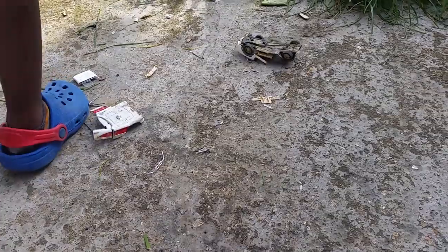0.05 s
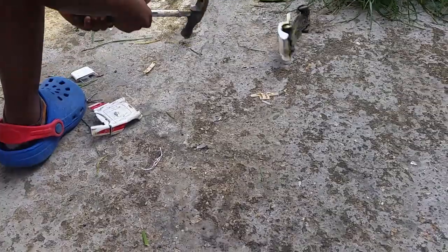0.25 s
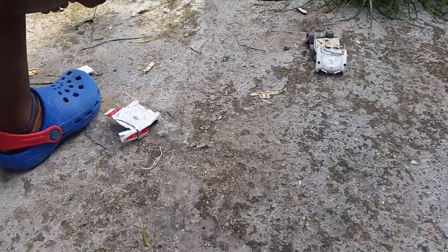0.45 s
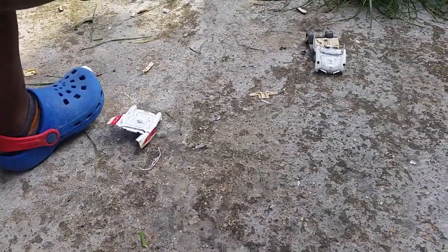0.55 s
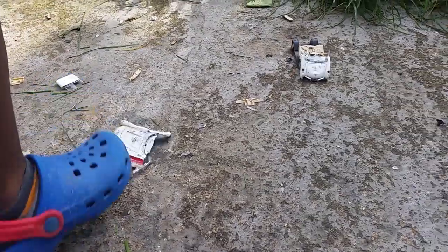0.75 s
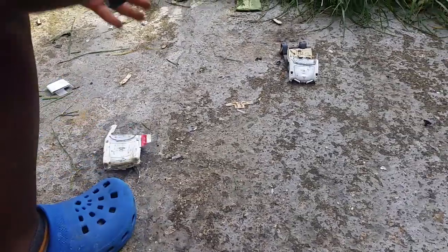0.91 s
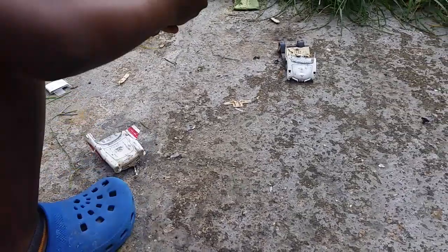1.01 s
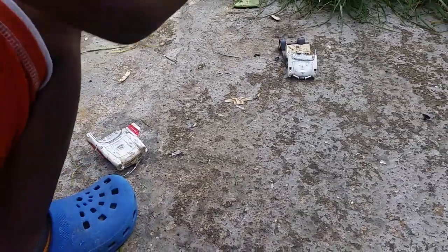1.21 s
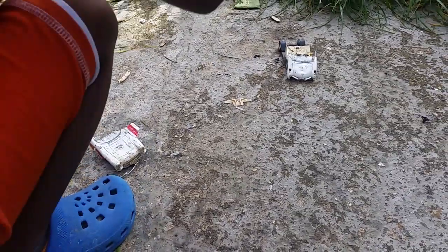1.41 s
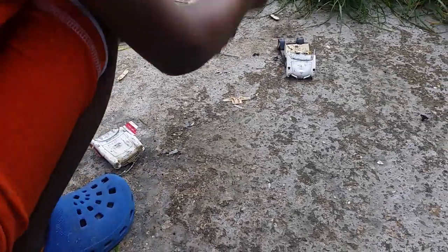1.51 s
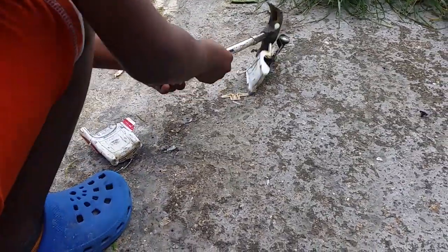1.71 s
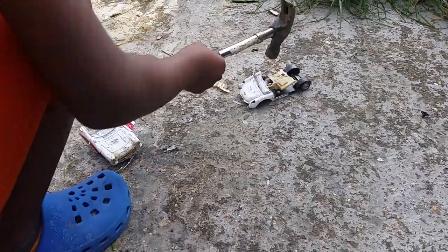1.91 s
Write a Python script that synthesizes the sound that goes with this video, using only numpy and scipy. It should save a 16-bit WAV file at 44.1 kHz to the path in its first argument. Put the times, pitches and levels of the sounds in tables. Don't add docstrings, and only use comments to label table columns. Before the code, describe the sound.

Hammer striking a toy car on concrete, close in stereo outdoors. Tinny rattles and a gritty scrape until 0.18 s, then a very loud, sharp crack at 0.23 s with hollow knocks and a bounce near 0.32 s. Faint thumps; a shoe nudges a loose shell, rattling at 0.55-0.67 and 0.8-1.1 s. Wind rumble swells with a faint high whistle before a weaker blow at 1.67 s and clattering bounces to 1.93 s.

```python
import sys
import numpy as np
from scipy import signal
from scipy.io import wavfile
from scipy.ndimage import uniform_filter1d

SR = 44100
rng = np.random.default_rng(int(sys.argv[2]) if len(sys.argv) > 2 else 0)


def int16_out(signal):
    q = np.round(np.clip(np.atleast_2d(signal).T, -1, 1) * 32767)
    wavfile.write(sys.argv[1], SR, q.astype(np.int16))


def field_ratio(decibels):
    return 10 ** (np.asarray(decibels, dtype=float) / 20)


N = 85995

# (time [s], level [dB], t60 [s], share of bright splinter [0-1])
CRACKS = [(0.2328, 4.5, 0.066, 0.54), (0.243, -12, 0.04, 0.03), (0.2654, -21, 0.26, 0.22),
          (.311, -29, .04, 0), (0.316, -20, 0.025, 0.23), (.343, -42.5, 0.032, 0.07),
          (0.4062, -32, 0.088, 0.08), (.443, -48.5, 0.052, 0.4), (0.4946, -51, 0.26, 0.27),
          (0.5096, -34, 0.096, 0.07), (0.5265, -32, 0.022, 0.53), (0.967, -44.5, 0.061, 0.12),
          (1.6705, -22.5, 0.03, 0.31), (1.6749, -23.5, 0.082, 0.6), (1.695, -31, 0.15, 0.5),
          (1.711, -27.5, 0.11, 0.36), (1.7215, -40, 0.13, 1), (1.737, -39.5, .08, 0.35),
          (1.749, -42, 0.134, 0.39), (1.781, -41, 0.15, 0.27), (1.8135, -44, 0.18, 0.4),
          (1.8286, -45.5, 0.065, 0.2), (1.84, -44.5, .08, 0.2), (1.845, -27.5, 0.02, 0.61),
          (1.853, -37.5, 0.095, 0), (1.897, -50, 0.16, 0.05), (1.929, -54, 0.036, 0.05)]
# (frequency [Hz], level [dB])
CAR_COLOUR = [(410, -33.5), (700, -4.5), (2700, -2.5), (6890, -1.5), (15000, -15.5), (16500, -21.5)]
# (frequency [Hz], level [dB])
SPLINTER_COLOUR = [(8000, -14), (12000, -9.5), (15000, -0.5), (16200, -5.5)]
# (time [s], level [dB])
SCRAPE = [
    (0, -42),
    (.07, -44),
    (.085, -34),
    (.13, -33),
    (.172, -32.5),
    (.182, -53.5),
    (.215, -66),
    (.23, -79),
]
# (frequency [Hz], level [dB])
SCRAPE_COLOUR = [(300, -4), (4500, -9), (7000, -6.5), (8300, -8.5), (8900, -19), (9600, -8.5),
                 (14500, -1.5), (16000, -7)]


def car():
    grit = lumps(3, size=30) * patchy(pair(0.45), 2.2)
    body_rows = [(s, field_ratio(db) * (1 - bright), 0.002, t60) for s, db, t60, bright in CRACKS]
    splinter_rows = [(s, field_ratio(db) * bright, 0.002, t60) for s, db, t60, bright in CRACKS]
    body = coloured(strikes(body_rows, rise_s=0.0015) * grit, CAR_COLOUR)
    splinter = coloured(strikes(splinter_rows, rise_s=0.0015) * grit[:, ::-1], SPLINTER_COLOUR)
    cracks = field_ratio(-9) * panned(-2) * (body + splinter)

    drag = field_ratio(curve(SCRAPE + [(0.24, -110)])) * lumps(2.5, size=90) * patchy(pair(0.5), 2.5)
    scrape = coloured(drag, SCRAPE_COLOUR, skirt_db=4.7)

    hum_hz, hum_width_hz, hum_end_s, hum_fade_s = 245, 4.2, 0.27, 0.024
    fade = np.clip((hum_end_s - np.arange(N) / SR) / hum_fade_s, 0, 1)
    hum = field_ratio(-42.5) * evened(resonate(pair(0.97), hum_hz, hum_width_hz)) * fade
    return cracks + scrape + hum


# (time [s], level [dB], pitch [Hz], t60 [s])
KNOCKS = [(0.2334, -1, 414.3, 0.011), (.2678, -8.5, 1012, 0.017), (0.2677, -6, 1350, 0.018),
          (.2678, -13.5, 790, 0.018), (.2678, -7.5, 476, 0.014), (0.316, -27, 300, 0.025),
          (0.408, -45, 1510, 0.11), (0.405, -27.5, 1000, 0.005), (.965, -35.5, 550, 0.018),
          (1.674, -13, 437, 0.011), (1.6766, -27, 339, 0.037), (1.6939, -22.5, 390, 0.022),
          (1.7, -32.5, 1126, 0.025), (1.7118, -35, 850, 0.028), (1.725, -26, 435, 0.028),
          (1.7244, -35.5, 1280, 0.03), (1.738, -33, 900, 0.009), (1.748, -26, 403, 0.0098),
          (1.848, -29, 900, 0.0026), (1.849, -52.5, 1493, 0.16), (1.85, -48.5, 2620, 0.071),
          (1.931, -60, 2640, 0.047), (1.6803, -31.5, 708, 0.014), (1.7, -31.5, 500, 0.02),
          (1.671, -26.5, 15260, 0.053)]


def concrete_knocks():
    return damped_swings([row + (0.5,) for row in KNOCKS], soft=0.3)


def damped_swings(rows, soft):
    out, t = np.zeros((2, N)), np.arange(N) / SR
    for s, db, hz, t60, pan_db in rows:
        u = np.clip(t - s, 0, None)
        sag = 0.07 / hz * (1 - np.exp(-u * hz * 0.23))
        swing = np.sin(2 * np.pi * hz * (u + sag)) * np.minimum(u * hz / soft, 1)
        out -= swing * field_ratio(db - 60 * u / max(t60, 0.005)) * panned(pan_db)
    return out


# (time [s], level [dB], width [s], direction [+1 or -1])
JOLTS = [
    (0.2334, -2.5, 0.0015, 1),
    (0.2426, -0.5, 0.00057, -1),
    (0.317, -23.5, 0.011, -1),
    (1.671, -18.5, 0.00071, 1),
    (1.677, -23, 0.0012, -1),
]


def jolts():
    port_hz, left_share = 75.6, 0.041
    t, push = np.arange(N) / SR, np.zeros(N)
    for s, db, width, direction in JOLTS:
        u = np.clip(t - s, 0, None) / width
        push += direction * field_ratio(db) * u * np.exp(1 - u)
    spring_back = signal.butter(2, port_hz, "high", fs=SR, output="sos")
    return signal.sosfilt(spring_back, push) * np.array([[left_share], [1]])


# (time [s], level [dB], hold [s], t60 [s])
RATTLES = [(0.0227, -16.5, 0.00081, 0.055), (0.0451, -14.5, 0.0043, 0.048), (0.1464, -25, 0.0091, .04),
           (0.1585, -23.5, 0.0047, 0.045), (0.548, -44, 0.0018, .04), (0.5563, -32.5, 0.0015, 0.066),
           (0.563, -35, 0.0026, 0.068), (0.579, -37, 0.0064, 0.053), (0.5854, -33, 0.0048, 0.046),
           (0.616, -42.5, .002, .05), (0.6204, -33.5, .002, .05), (0.6268, -37, 0.0067, 0.059),
           (0.658, -51, 0.0022, 0.034), (0.667, -46, .004, .06), (0.777, -55, .004, .05),
           (0.8102, -40.5, .002, 0.046), (0.8131, -31.5, 0.0048, 0.045), (.821, -35.5, 0.0044, 0.024),
           (0.8414, -58, .004, .04), (0.855, -27, 0.0038, 0.048), (0.877, -44.5, 0.0028, 0.044),
           (0.8827, -31.5, 0.002, 0.05), (0.8846, -27.5, .002, .05), (.896, -32, 0.0034, 0.055),
           (.906, -32, 0.0051, 0.065), (.923, -36.5, .005, 0.097), (0.935, -35.5, 0.0031, 0.056),
           (1.0673, -41, .003, 0.071), (1.104, -46, .002, 0.057), (1.111, -42, 0.0077, 0.093),
           (1.17, -60, .004, .06), (1.692, -23, 0.0029, .04), (1.713, -27.5, 0.011, 0.057),
           (1.778, -40.5, 0.0036, 0.062), (1.7954, -43, .002, .04), (1.829, -34, .003, 0.036),
           (1.847, -29.5, 0.0022, 0.07), (1.8968, -43.5, 0.0032, .06), (1.9128, -40.5, 0.002, 0.021)]
# (frequency [Hz], level [dB])
TIN_COLOUR = [(410, -40), (700, -18.5), (2840, -12.5), (4000, -21.5), (4800, -16), (5400, -5), (7010, -0.5),
              (9110, -21), (16000, -7.5)]
# (frequency [Hz], width [Hz], level [dB])
TIN_RINGS = [(2145, 70, -12.5), (2850, 220, -3.5), (4046, 100, -16.5), (5530, 60, -4), (6400, 70, -2.5),
             (6780, 90, -7), (7160, 57, -2), (7930, 70, -3.5), (9470, 44, -13), (10240, 130, -6),
             (11300, 97, -10), (13850, 130, -15), (14500, 70, -9), (15500, 200, -12)]


def tin():
    rows = [(s, field_ratio(db), hold, t60) for s, db, hold, t60 in RATTLES]
    grit = strikes(rows, rise_s=0.0025) * lumps(2.5, size=30) * patchy(pair(0.75), 3.5)
    rings = np.zeros((2, N))
    for hz, width, db in TIN_RINGS:
        ring = resonate(grit * lumps(7, size=500), hz, width)
        rings += field_ratio(db) * ring / np.sqrt(np.pi * width / SR)
    return field_ratio(-17.5) * panned(0.5) * (coloured(grit, TIN_COLOUR) + field_ratio(-5.5) * rings)


# (time [s], level [dB], pitch [Hz], t60 [s], left over right [dB])
THUMPS = [
    (.005, -36.5, 81, 0.29, 0),
    (.11, -32, 91, .2, 1),
    (.16, -30, 59, 0.085, -1),
    (.322, -30, 79, 0.08, -2.5),
    (.385, -43, 67, .12, -16),
    (.515, -42, 57, 0.18, 5),
    (.89, -48.5, 91, 0.32, -1),
    (.968, -37.5, 150, 0.072, -3),
    (1.21, -47.5, 82, .12, -3),
    (1.61, -40.5, 90, .12, 0),
]


def ground_thumps():
    return damped_swings(THUMPS, soft=0.54)


# (frequency [Hz], t60 [s])
YARD_T60 = [(1000, 0.12), (15000, 0.13)]


def yard(x):
    taps = np.zeros((2, SR // 2))
    slots = np.arange(100, SR // 2 - 20, 20)
    at = slots + rng.integers(0, 20, (2, len(slots)))
    np.put_along_axis(taps, at, rng.choice([-1.0, 1.0], at.shape), 1)
    hz, t, z = signal.stft(taps, SR, nperseg=256)
    decay = field_ratio(-60 * t / read(YARD_T60, hz)[:, None])
    tail = signal.istft(z * decay, SR, nperseg=256)[1]
    tail = tail / np.linalg.norm(tail[0])
    return field_ratio(-14.5) * signal.fftconvolve(x.mean(0)[None], tail, axes=1)[:, :N]


# (time [s], level [dB])
GUST = [(0, -49), (.17, -45.5), (.21, -41.5), (.228, -89), (.26, -43.5), (.45, -53.5), (.75, -57),
        (1.3, -57), (1.5, -51.5), (1.63, -48), (1.665, -61.5), (1.72, -51), (1.95, -59)]
# (frequency [Hz], level [dB])
RUMBLE_COLOUR = [(12, -36), (20, -5), (85, 0.5), (130, -6.5), (177, -2), (211, -18), (352, -27.5),
                 (900, -49), (1980, -120)]
# (frequency [Hz], level [dB])
ROAR_COLOUR = [(120, -34.5), (200, 2.5), (1160, -21.5), (2140, -46.5), (3190, -32), (4000, -54.5),
               (5200, -82), (8800, -120)]
# (frequency [Hz], level [dB])
AIR_COLOUR = [(410, -33), (700, -9), (1730, -13.5), (4380, -16), (16000, -42.5)]
# (time [s], level [dB])
WHISTLE = [
    (1.33, -90),
    (1.401, -69.5),
    (1.445, -77),
    (1.519, -58),
    (1.59, -63.5),
    (1.63, -61),
    (1.655, -68.5),
]


def wind():
    gust_db = curve(GUST)
    rumble = field_ratio(gust_db + 1.5) * lumps(2, size=700) * coloured(pair(0.8), RUMBLE_COLOUR)

    calm_db, roar_follow = -55.5, 1.59
    roar_gain = field_ratio(-65.5 + roar_follow * (gust_db - calm_db))
    roar = roar_gain * lumps(1.2, size=400) * coloured(pair(0.43), ROAR_COLOUR, skirt_db=28)

    air = field_ratio(-84.5) * coloured(pair(0.44), AIR_COLOUR, skirt_db=12)

    whistle_hz = 15000
    tone = resonate(resonate(pair(0.25), whistle_hz, 200), whistle_hz, 140)
    whistle_db = curve([(1.3, -120)] + WHISTLE + [(1.67, -120)]) - 1
    return rumble + roar + air + field_ratio(whistle_db) * evened(tone)


def strikes(rows, rise_s):
    tick_s = 0.002
    power, t = np.zeros(N), np.arange(N) / SR
    for s, gain, hold, t60 in rows:
        u = t - s
        tick = 1 + np.exp(-abs(u - rise_s / 2) / tick_s)
        rise = np.clip(u / rise_s + 0.5, 0, 1)
        decay = field_ratio(-60 * np.clip(u - hold, 0, 1) / t60)
        power += (gain * tick * rise * decay) ** 2
    return np.sqrt(power)


def lumps(depth_db, size):
    drift = uniform_filter1d(uniform_filter1d(rng.standard_normal(N), size), size)
    return evened(field_ratio(depth_db * evened(drift)))


def patchy(x, depth_db):
    z = signal.stft(x, nperseg=256)[2]
    field = uniform_filter1d(rng.standard_normal(z.shape[1:]), size=2, axis=0)
    field = uniform_filter1d(field, size=7, axis=1)
    gain = evened(field_ratio(depth_db * evened(field)))
    return signal.istft(z * gain, nperseg=256)[1][:, :N]


def pair(same):
    a, b = rng.standard_normal((2, N))
    return np.array([a, same * a + np.sqrt(1 - same ** 2) * b])


def coloured(x, points, skirt_db=30.5):
    hz = abs(np.fft.fftfreq(8192, 1 / SR)) + 1
    below = np.maximum(np.log2(points[0][0] / hz), 0)
    above = np.maximum(np.log2(hz / points[-1][0]), 0)
    gain_db = np.maximum(read(points, hz) - skirt_db * (below + above), -100)
    log_gain = np.log(field_ratio(gain_db))
    minimum_phase = -signal.hilbert(log_gain).imag
    taps = np.fft.ifft(np.exp(log_gain + 1j * minimum_phase)).real[:4096]
    return signal.oaconvolve(x, taps[None] / np.linalg.norm(taps), axes=1)[:, :N]


def resonate(x, hz, width):
    turn = np.exp(2j * np.pi * hz * np.arange(N) / SR)
    r = np.exp(-np.pi * width / SR)
    return 2 * (turn * signal.lfilter([1 - r], [1, -r], x / turn)).real


def evened(x):
    return x / np.sqrt(np.mean(x ** 2) + 1e-20)


def curve(points):
    return np.interp(np.arange(N) / SR, *np.transpose(points))


def read(points, hz):
    f, value = np.transpose(points)
    return np.interp(np.log(hz + 1), np.log(f + 1), value)


def panned(pan_db):
    return field_ratio(np.array([[0.5], [-0.5]]) * pan_db)


def left_first(x, count):
    return np.array([x[0], np.pad(x[1], (count, 0))[:N]])


def scene():
    toy = car() + concrete_knocks()
    car_moved_s = 1.5
    toy = np.where(np.arange(N) < car_moved_s * SR, left_first(toy, 8), toy)
    near = toy + left_first(tin(), 5)
    return near + jolts() + ground_thumps() + yard(near) + wind()


def low_pass(x):
    return signal.sosfilt(signal.butter(12, 17020, fs=SR, output="sos"), x)


def record(dry):
    ceiling, edge_hz, above_edge_db = 0.8, 15900, -32
    held = ceiling * np.tanh(dry / ceiling)
    edge = signal.firwin(255, edge_hz, window=("kaiser", 7), fs=SR)
    low = signal.oaconvolve(held, edge[None], "same")
    mix = low + field_ratio(above_edge_db) * (held - low)
    return low_pass(mix)


dry = scene()
out = record(dry)
int16_out(out)
```